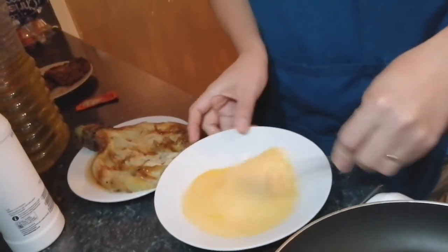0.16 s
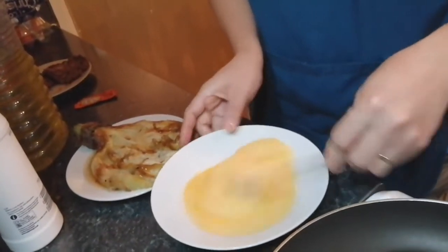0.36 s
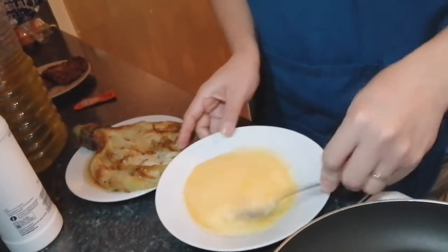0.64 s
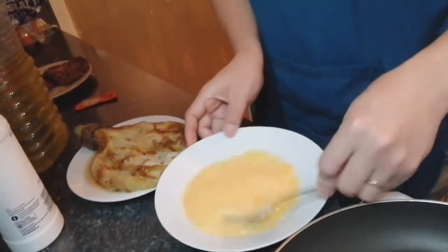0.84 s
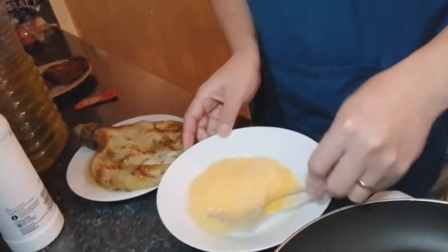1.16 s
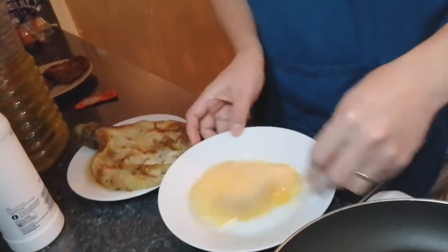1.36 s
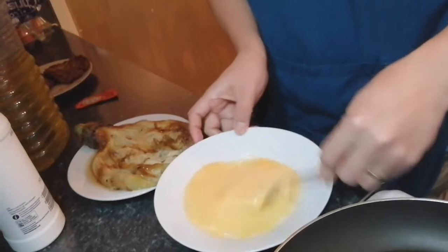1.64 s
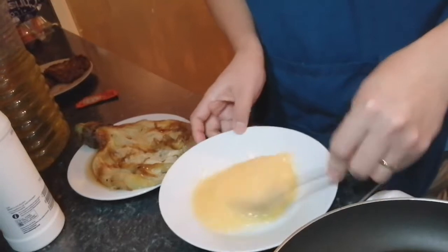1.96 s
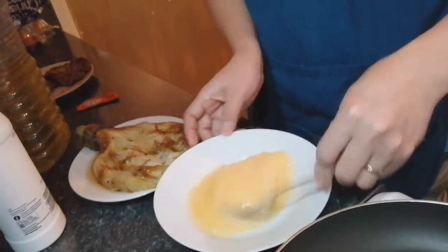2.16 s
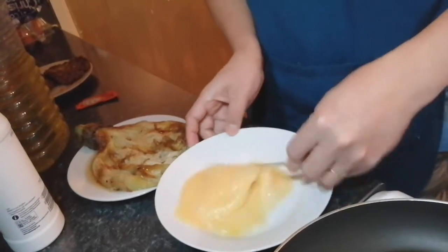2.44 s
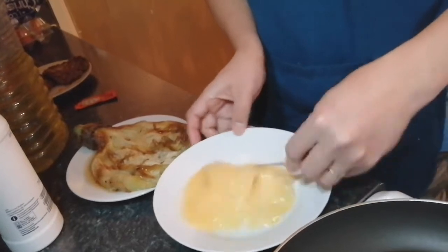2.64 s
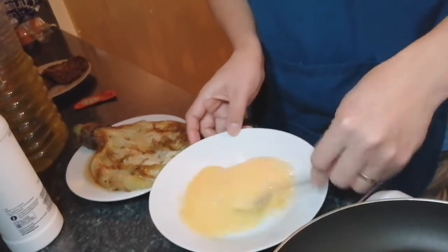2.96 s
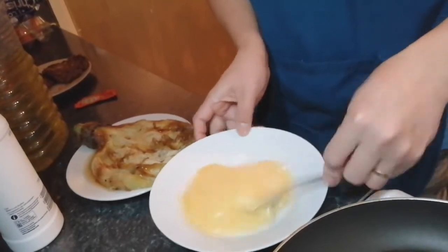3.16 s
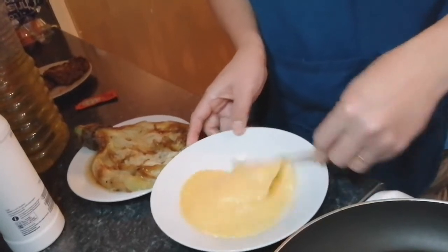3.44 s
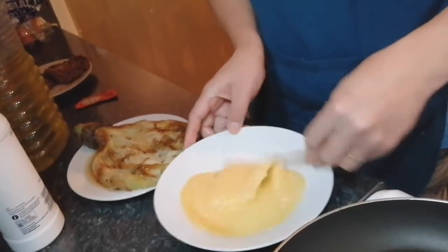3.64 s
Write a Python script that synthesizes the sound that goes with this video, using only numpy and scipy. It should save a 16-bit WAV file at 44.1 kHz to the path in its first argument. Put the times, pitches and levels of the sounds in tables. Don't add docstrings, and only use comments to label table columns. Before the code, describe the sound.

Fork tines chatter and clink steadily on a ceramic plate, whisking egg about five times a second

```python
import sys
import numpy as np
from scipy import signal
from scipy.fft import rfft, irfft
from scipy.io import wavfile

SR = 44100
rng = np.random.default_rng(int(sys.argv[2]) if len(sys.argv) > 2 else 0)


def master(y):
    cut = np.clip(np.atleast_2d(y).T, -1, 1)
    pcm = np.round(cut * 32767)
    wavfile.write(sys.argv[1], SR, pcm.astype(np.int16))


def elevation(decibels):
    levels = np.asarray(decibels, float)
    return 10 ** (levels / 20)


N = 167580
PAD = 16384
SPAN = 8192

# lowest, second and middle plate modes level/dB
STROKES = [(0.1107, -19.5, -34, -32, -15.5), (0.3132, -17.5, -31, -26.5, -16.5),
           (0.5084, -23.5, -20.5, -56, -16), (0.6975, -19, -35.5, -45, -18.5),
           (0.899, -20.5, -28.5, -47, -18.5), (1.087, -21, -27, -52, -14.5), (1.286, -21, -25, -38, -18.5),
           (1.481, -22, -23, -30, -10), (1.5575, -33, -24, -25, -21), (1.6911, -19, -23.5, -27.5, -14.5),
           (1.8867, -27.5, -21, -5.5, -7.5), (2.0802, -21.5, -21.5, -26, -11.5),
           (2.2744, -21.5, -20, -19, -13), (2.4619, -22.5, -23.5, -17.5, -12), (2.6516, -21, -28, -28, -12),
           (2.841, -24, -23.5, -26, -16), (3.041, -20.5, -28.5, -31.5, -16.5),
           (3.2316, -30.5, -20.5, -23.5, -6.5), (3.433, -24.5, -33, -24.5, -12.5),
           (3.6261, -25, -28, -28, -18)]
EARLIER_STROKE = (-0.085, -20, -27, -14, -15)
# favoured fork f/Hz, fork top level/dB, fork low level/dB, favoured plate f/Hz, chatter t/ms
LANDINGS = [(6900, -3, -4, 2900, 8), (6300, -4, 0, 3000, 9), (6410, -3, -2, 2680, 8),
            (6940, -0.5, 6.5, 2870, 8), (6430, -3, -17, 4500, 8.7), (6380, 1, -21, 3306, 8),
            (7150, -4, 8, 3430, 5), (6460, 0.5, 5.5, 3200, 5.1), (7500, 4, 12, 2125, 8.5),
            (6820, 2.5, -2, 3190, 24), (7520, -6, 3, 1600, 10), (6580, 6, 10, 2460, 4.8),
            (6410, -4, -11, 2210, 10), (6360, 1, 7, 3220, 8), (6900, 6.5, 5, 3110, 8),
            (7100, 1, -30, 1900, 5), (7000, 0.5, 2, 2810, 4.1), (7250, 1.5, 1, 2950, 6.7),
            (6700, 5, 10.5, 1400, 13), (6530, -2, 2, 3230, 14), (6770, 0.5, 3, 3220, 9.3)]
# t/s, peak level/dB, left-right level/dB
RETOUCHES = [(0.136, -29.5, -9.5), (0.2064, -39.5, -7), (0.339, -52, -2), (0.3676, -32, -3.5),
             (0.399, -43, -11), (0.712, -27.5, 1), (0.7412, -43, -2), (0.7467, -34.5, -9),
             (0.9288, -33, 14), (1.506, -29, 2), (1.8103, -47.5, 4), (2.1106, -44, -12), (2.1375, -38, -18),
             (2.299, -28, -1), (2.862, -33, -3), (3.078, -35, 7), (3.452, -51, -3), (3.4805, -38.5, -15),
             (3.645, -38, -12)]
# t/s, peak level/dB, left-right level/dB, brightness f/Hz
TICKS = [(0.2884, -44, 4, 5950), (0.468, -42, 3, 8000), (0.7804, -50, -6, 6000), (0.8846, -45, -3, 6940),
         (1.2524, -36, 17, 8500), (1.269, -29.5, 5, 5040), (1.475, -40, 1, 4020), (1.667, -41, 2, 8000),
         (2.264, -43, -7, 7050), (2.268, -33, -6, 5300), (2.775, -48, -3, 6900), (2.819, -30, 2, 8700),
         (3.014, -48, -6, 7500), (3.207, -39, 0, 7500), (3.412, -32, 7, 5060), (3.4173, -29, -5, 6800),
         (3.42, -47, 7, 7000), (3.429, -40, -3, 3020), (3.6014, -27.5, -4.5, 9050), (3.603, -29, 14, 9000),
         (3.613, -36.5, 1, 7500)]
TICK_SKID_S = [0, .0008, .002, -.0012, .004, .007]
TICK_SKID_DB = [0, -3.0, -7.0, -10.0, -12.0, -15.0]
# t/s, thump level/dB, thump f/Hz, plate ring level/dB
KNOCKS = [
    (0.53, -49, 208, -55),
    (1.119, -45.5, 211, -86),
    (1.484, -41.5, 243, -67),
    (1.649, -62, 300, -43),
    (1.695, -51, 70, -41),
    (1.806, -45, 220, -46.5),
    (1.891, -41, 252, -62),
    (2.078, -56, 70, -86),
    (2.195, -81, 247, -53.5),
]
# f/Hz, level/dB, t60/s
PLATE = [(467.2, 3.5, 0.082), (546, 0, 0.02), (804.5, 1.5, 0.16), (893, -1, 0.049), (941, -3.5, 0.025),
         (1430, -2, 0.0097), (1482, -3.5, 0.02), (1799, -3, 0.071), (2197, -1.5, 0.011),
         (2532, -6.5, 0.026), (2821, 4, 0.032), (3186, 12, 0.012), (3305, 5.5, 0.013), (3583, -10, 0.032)]
# f/Hz, level/dB, t60/s
FORK = [(4500, -19.5, 0.016), (4940, -66, 0.0067), (5395, -5, 0.013), (6000, 1, 0.003), (6537, 1.5, 0.024),
        (6640, 2.5, 0.043), (6823, 0.5, 0.033), (7050, -2.5, 0.035), (7410, -3.5, 0.025),
        (7700, -3, 0.0097), (8380, -8.5, 0.016), (10610, -4, 0.014), (11296, -7, 0.011),
        (12470, 1.5, 0.0072)]
# f/Hz, t60/s
ROOM_T60 = [(200, 0.16), (530, 0.27), (1400, 0.32), (3700, 0.42), (9700, 0.29), (14000, 0.37)]
# f/Hz, level/dB
ROOM_COLOUR = [(200, 8.5), (700, 14), (2000, 6.5), (7000, 3.5), (13000, 10)]
# t/s, hum level/dB
HUM_SWELL = [(0.0, -73.5), (0.5, -64.5), (0.9, -74), (1.24, -59.5), (1.59, -73.5), (2.03, -63.5),
             (2.09, -71.5), (3.8, -69.5)]
# f/Hz, level/dB per Hz
AIR = [(20, -10), (72, -15), (125, -2.5), (300, -14), (1000, -12), (3000, -21.5), (8000, -71), (13000, -57)]
# f/Hz, width/Hz, depth 0-1
MIC_DIPS = [(3910, 335, 0.45), (5697, 730, 0.56), (9060, 450, 0.98)]

PLATE_DB, FORK_DB, CRACK_DB, TICK_DB, TICK_RING_DB = -6, -11.5, 0.4, 7, -10
LEAD_IN_S, LEAD_IN_DB = 0.0055, -21.5
CHATTER_LOSS_DB, CHATTER_PEAK = 13, 0.25
DRAG_S, DRAG_DB, DRAG_FADE_DB = .03, -12.0, 14.0
TOUCH_SPREAD_DB, MODE_SPREAD_DB = 9.0, 3.0
SIDE_SPREAD_DB, LAG_SPREAD_S = 1, .00025
LOW_DELAY_CYCLES = 1.5
DETUNE = 0.028
REGRIP_S, FIRM_GRIP_RAISE = 1.4, 1.085
FAVOUR_DB, FAVOUR_WIDTH = 7.5, 0.03
RETOUCH_DB, RETOUCH_S = -14, .005
SLOSH_DB, SLOSH_S, SLOSH_LOW_HZ, SLOSH_HIGH_HZ, SLOSH_CYCLES, SLOSH_RISE = -38.5, .17, 300, 2210, 13.9, 0.353
KNOCK_CYCLES, KNOCK_SOFT_HZ = 6.6, 554
ROOM_DB, ROOM_ONSET_S, ROOM_LIKENESS = 0.95, 0.011, 0.24
HUM_HZ, HUM_WIDTH_HZ, AIR_DB = 101.2, 8.8, -68.5
LEFT_DB = 0.5
CUTOFF_HZ = 11700


def strokes():
    s, db, first, second, middle = np.transpose([EARLIER_STROKE] + list(STROKES))
    fork_hz, top, low, plate_hz, _ = np.transpose(LANDINGS)
    grip = np.where(s < REGRIP_S, FIRM_GRIP_RAISE, 1)
    dt, touch_db = contacts()
    s, db = s[:, None] + dt, db[:, None] + touch_db

    plate_groups = []
    for hz, _, _ in PLATE:
        if hz < 700:
            plate_groups.append(first)
        elif hz < 850:
            plate_groups.append(second)
        elif hz < 1600:
            plate_groups.append((first + middle) / 2)
        else:
            plate_groups.append(middle + favour(hz, plate_hz))
    fork_groups = []
    for hz, _, _ in FORK:
        fork_groups.append(low if hz < 5800 else top if hz > 7800 else favour(hz, fork_hz))

    g = elevation(db + CRACK_DB) * rng.choice([-1, 1], db.shape)
    crack = butter(2, [1500, 13000], "band", train(s, g, g, LAG_SPREAD_S))
    none = 0 * first
    plate = strike(s, db + PLATE_DB, none, PLATE, plate_groups, grip)
    fork = strike(s, db + FORK_DB, none, FORK, fork_groups, none + 1)
    return butter(2, 300, "high", plate + fork + crack)


def contacts(count=8, size=7, order=5):
    u = rng.random((len(STROKES) + 1, count + size + order, 2))
    graze = u[:, :count, 0]
    land = u[:, count:count + size, 0].copy()
    drag = u[:, count + size:, 0]
    land[:, 0] = 0
    chatter_s = np.array(LANDINGS)[:, 4:] / 1000
    dt = np.hstack([-LEAD_IN_S * graze, chatter_s * land, chatter_s + DRAG_S * drag])
    graze_db = LEAD_IN_DB * (0.41 + graze)
    land_db = -CHATTER_LOSS_DB * np.abs(land - CHATTER_PEAK)
    db = np.hstack([graze_db, land_db, DRAG_DB - DRAG_FADE_DB * drag])
    db = db + TOUCH_SPREAD_DB * (u[..., 1] - .5)
    return dt, db - 10 * np.log10(np.sum(elevation(2 * db), axis=1, keepdims=True) / 4)


def strike(s, db, pan_db, modes, group_db, lowest_raise):
    out = np.zeros((2, N + PAD + SPAN))
    z = rng.standard_normal((len(s), len(modes), 4))
    signs = rng.choice([-1, 1], (len(s), len(modes), s.shape[1]))
    for e in range(len(s)):
        start = int(s[e].min() * SR) - 64
        at = (s[e] * SR).astype(int) - start
        for m, (hz, level_db, t60) in enumerate(modes):
            g = elevation(db[e] + level_db + group_db[m][e] + MODE_SPREAD_DB * z[e, m, 0]) * signs[e, m]
            pan = elevation((pan_db[e] + SIDE_SPREAD_DB * z[e, m, 1]) / 2)
            lag = int(np.clip(LAG_SPREAD_S * SR * z[e, m, 2], -60, 60))
            clicks = np.zeros(SPAN)
            np.add.at(clicks, at + int(LOW_DELAY_CYCLES * SR / hz), g)
            tuned_hz = hz * (1 + DETUNE * min(1, 2500 / hz) * z[e, m, 3])
            if m == 0:
                tuned_hz = tuned_hz * lowest_raise[e]
            y = ring(clicks, tuned_hz, t60)
            energy = np.sum(g ** 2) * t60 * SR / (4 * np.log(1000))
            y = y * np.sqrt(energy / np.sum(y ** 2))
            out[:, start + PAD:start + PAD + SPAN] += [pan * y, np.roll(y, lag) / pan]
    return out[:, :N + PAD]


def favour(hz, centre_hz):
    return FAVOUR_DB * (np.exp(-.5 * (np.log(hz / centre_hz) / FAVOUR_WIDTH) ** 2) - .5)


def ring(clicks, hz, t60):
    r, w = elevation(-60 / (t60 * SR)), 2 * np.pi * hz / SR
    return signal.lfilter([0, np.sin(w)], [1, -2 * r * np.cos(w), r * r], clicks + 1e-18)


def train(s, left, right, lag_s):
    out = np.zeros((2, N + PAD))
    for side, when, height in [(0, s, left), (1, s + lag_s, right)]:
        np.add.at(out[side], np.clip((when * SR).astype(int) + PAD, 0, N + PAD - 1), height)
    return out


def butter(order, hz, kind, x):
    return signal.sosfilt(signal.butter(order, hz, kind, fs=SR, output="sos"), x)


def retouches(count=4):
    s, db, pan = np.transpose(RETOUCHES)
    s = s[:, None] + RETOUCH_S * rng.random((len(s), count))
    return strike(s, db[:, None] + RETOUCH_DB + 0 * s, pan, FORK[2:10], [0 * db] * 8, 0 * db + 1)


def slosh(count=12):
    out = np.zeros((2, N + PAD + SPAN))
    t = np.arange(2048) / SR
    rows = [EARLIER_STROKE] + list(STROKES)
    for row, draws in zip(rows, rng.random((len(rows), count, 4))):
        for when, pitch, size, pan in draws:
            hz = SLOSH_LOW_HZ * (SLOSH_HIGH_HZ / SLOSH_LOW_HZ) ** pitch
            age = t * hz / SLOSH_CYCLES
            swell = 10 * age * np.exp(-6.0 * age)
            tone = np.sin(2 * np.pi * hz * t * (1 + SLOSH_RISE * age))
            y = elevation(row[1] + SLOSH_DB - 5.4 * size) * swell * tone
            i = int((row[0] + .02 + SLOSH_S * when) * SR) + PAD
            out[:, i:i + len(t)] += np.outer([.5 + pan, 1.5 - pan], y)
    return out[:, :N + PAD]


def ticks():
    s, db, pan, bright_hz = (c[:, None] for c in np.transpose(TICKS))
    s = s + np.array(TICK_SKID_S) * rng.uniform(.5, 1.5, (len(s), len(TICK_SKID_S)))
    db = db + np.array(TICK_SKID_DB)
    snap = 0
    for t, g, p, hz in zip(s, elevation(db + TICK_DB), pan, bright_hz[:, 0]):
        clicks = train(t, g * elevation(p / 2), g / elevation(p / 2), LAG_SPREAD_S)
        snap = snap + butter(1, [0.9 * hz, 1.7 * hz], "band", clicks + 1e-18)
    modes = [(hz, level_db, .5 * t60) for hz, level_db, t60 in PLATE[10:] + FORK]
    groups = [-12.0 * np.abs(np.log2(hz / bright_hz[:, 0])) for hz, _, _ in modes]
    return snap + strike(s, db + TICK_RING_DB, pan[:, 0], modes, groups, np.ones(len(s)))


def knocks():
    out = 0
    for s, db, hz, ring_db in KNOCKS:
        click = train(np.array([s]), 1, elevation(-4.0), 0)
        thump = ring(click, hz, min(KNOCK_CYCLES / hz, .05))
        plate = ring(click, PLATE[0][0], 0.072) + 2 * ring(click, PLATE[2][0], 0.081)
        out = out + elevation(db) * thump + elevation(ring_db) * plate
    return butter(2, KNOCK_SOFT_HZ, "low", out)


def kitchen(x):
    t = np.arange(PAD) / SR
    mid, side = rng.standard_normal((2, PAD))
    c = np.clip(ROOM_LIKENESS, -1, 1)
    white = np.sqrt(1 + c) * mid + np.sqrt(1 - c) * side * [[1], [-1]]
    tail = 0
    for lo in 100 * 2. ** np.arange(8):
        hi = 1.5 * lo if lo > 1e4 else 2 * lo
        decay_db = at_hz(ROOM_COLOUR, 1.4 * lo) - 60 * t / at_hz(ROOM_T60, 1.4 * lo)
        tail = tail + butter(2, [lo, hi], "band", white) * elevation(decay_db)
    tail = tail * (1 - np.exp(-(t / ROOM_ONSET_S) ** 2))
    tail = elevation(ROOM_DB) * tail / np.sqrt((tail ** 2).sum(axis=1).mean())
    return signal.fftconvolve(x, tail, axes=1)[:, :N + PAD]


def at_hz(points, hz):
    table = np.array(points)
    return np.interp(np.log(hz), np.log(table[:, 0] + 1e-9), table[:, 1])


def background():
    white = rng.standard_normal((3, N + PAD))
    hum_t60 = 1.36 / HUM_WIDTH_HZ
    wobble = ring(ring(white[0], HUM_HZ, hum_t60), HUM_HZ, hum_t60)
    steady = 2.1 * np.sin(2 * np.pi * HUM_HZ * np.arange(N + PAD) / SR)
    hum = rms_one(rms_one(wobble) + steady)
    swell = elevation(np.interp(np.arange(-PAD, N) / SR, *np.transpose(HUM_SWELL)))
    hz = np.arange((N + PAD) // 2 + 1) * SR / (N + PAD) + 1
    hiss = irfft(rfft(white[1:] + 0.89 * white[0]) * elevation(at_hz(AIR, hz)), N + PAD)
    return swell * hum + elevation(AIR_DB) * rms_one(hiss)


def rms_one(x):
    return x / np.sqrt(np.mean(x ** 2))


def scene():
    dry = strokes() + slosh() + ticks() + retouches() + knocks()
    balance = elevation(np.array([[LEFT_DB / 2], [-LEFT_DB / 2]]))
    return ((dry + kitchen(dry) + background()) * balance)[:, PAD:]


def roll_off(x):
    return signal.sosfilt(signal.butter(12, 13790, fs=SR, output="sos"), x)


def record(dry):
    for hz, width_hz, depth in MIC_DIPS:
        band = signal.lfilter(*signal.iirpeak(hz, hz / width_hz, fs=SR), dry)
        dry = dry - np.clip(depth, 0, 1) * band
    return roll_off(butter(6, CUTOFF_HZ, "low", dry))


dry = scene()
out = record(dry)
master(out)
```